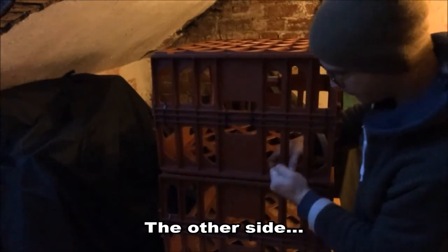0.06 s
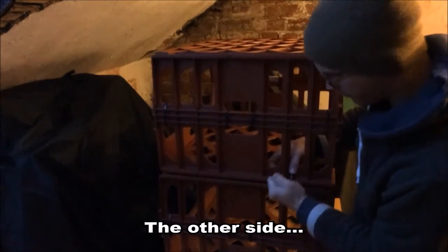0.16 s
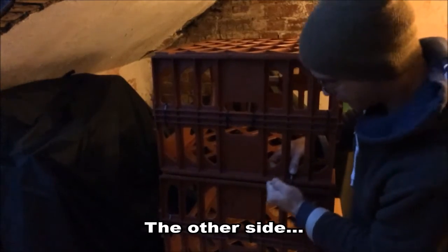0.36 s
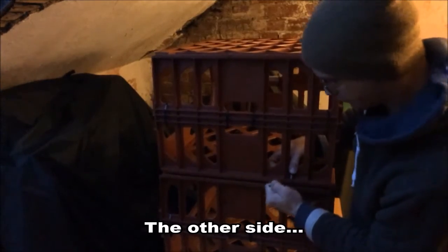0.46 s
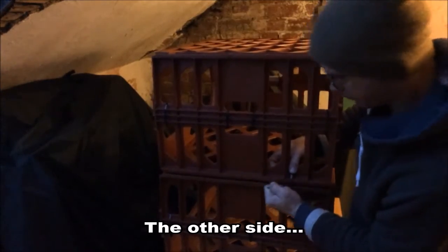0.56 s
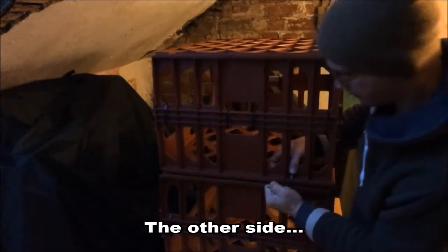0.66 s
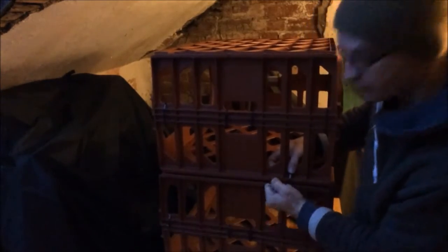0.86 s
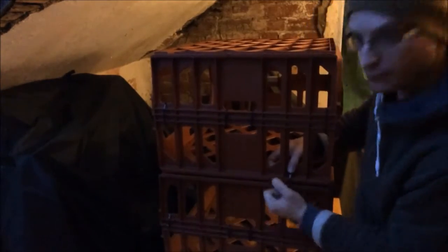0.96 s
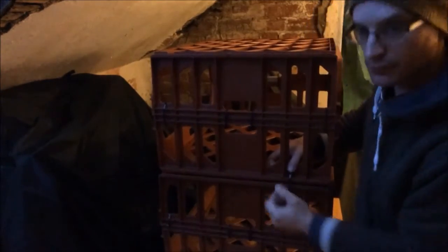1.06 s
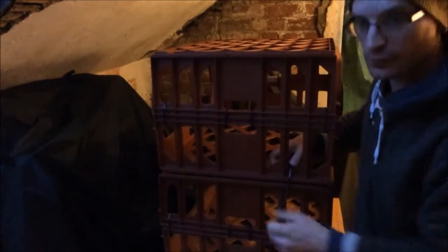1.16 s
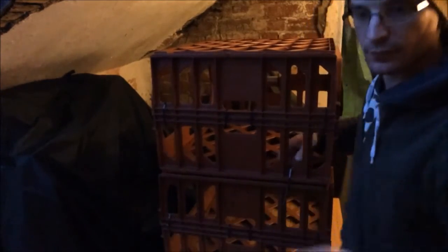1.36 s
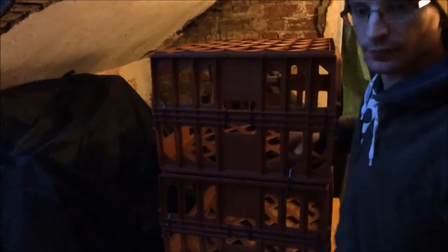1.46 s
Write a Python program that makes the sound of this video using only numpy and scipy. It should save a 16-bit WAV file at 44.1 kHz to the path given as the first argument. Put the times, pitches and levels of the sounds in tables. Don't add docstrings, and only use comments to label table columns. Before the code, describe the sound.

Cable tie ratchet clicks quickly, then snaps hard against a ringing crate in a small attic

```python
import sys
import numpy as np
from scipy import signal
from scipy.fft import rfft, irfft
from scipy.io import wavfile
from scipy.ndimage import uniform_filter1d

SR = 44100
rng = np.random.default_rng(int(sys.argv[2]) if len(sys.argv) > 2 else 0)


def generate_wav(signal):
    frames = np.transpose(np.atleast_2d(signal))
    scaled = np.clip(frames, -1, 1) * 32767
    pcm = np.round(scaled).astype(np.int16)
    wavfile.write(sys.argv[1], SR, pcm)


def how_loud(loudness_db):
    steps = np.asarray(loudness_db, float) / 20
    return 10 ** steps


N = 66150
T = np.arange(N) / SR


def unit(x):
    return x / np.sqrt(np.mean(x ** 2))


def band(x, hz, q):
    return signal.lfilter(*signal.iirpeak(hz, max(q, hz / SR * 3), fs=SR), x)


def high(x, hz):
    return signal.sosfiltfilt(signal.butter(8, hz, "high", fs=SR, output="sos"), x)


def walk(rate):
    hold = int(SR / rate)
    levels = np.repeat(rng.standard_normal(N // hold + 1), hold)
    return uniform_filter1d(uniform_filter1d(levels, hold), hold)[:N]


def air():
    # frequency in Hz, level in dB per Hz.
    air_colour = [(18, -35.5), (30, -11), (137, -2.5), (213, -8), (532, -15.5), (808, -17.5), (1260, -20.5),
                  (2070, -23.5), (15500, -46)]
    air_db, flicker_db, flicker_hz = -63, 2, 9.1
    points = np.array(air_colour)
    f = np.arange(N // 2 + 1) * SR / N + 1
    colour = how_loud(np.interp(np.log(f), np.log(points[:, 0]), points[:, 1]))
    out = 0
    for hz in 30 * 2. ** np.arange(10):
        share = np.cos(np.pi / 2 * np.clip(np.log2(f / hz), -1, 1))
        octave = irfft(rfft(rng.standard_normal(N)) * colour * share, N)
        out = out + how_loud(flicker_db * walk(flicker_hz)) * octave
    return how_loud(air_db) * unit(out)


def brush():
    # time in seconds, level in dB.
    arm_path = [(0, -77.5), (.045, -78.5), (.11, -82.5), (.3, -66), (.53, -82.5), (.6, -75.5), (.91, -75.5),
                (.97, -78), (1.09, -78.5), (1.19, -74), (1.25, -80.5), (1.35, -83), (1.41, -74),
                (1.5, -77.5)]
    grain_db, cloth_hz, trim_db = 1.5, 7820, -2
    points = np.array(arm_path)
    grain = rng.standard_normal(N) * how_loud(grain_db * walk(400))
    loudness = how_loud(trim_db + np.interp(T, points[:, 0], points[:, 1]))
    return loudness * unit(band(grain, cloth_hz, 0.27))


def ratchet(rows, modes, fizz_db):
    tooth_s, tooth_jitter, tooth_db = 0.00045, 0.3, 1.5
    click_q, scrape_db, fizz_hz = 0.866, -12, 5860
    ring_cycles = 1.195
    echo_db, ring_echo_db = 4, -3.5
    out, t = np.zeros((2, N + 8192)), T[:4096]
    for s, db, hz, length, ring_db in rows:
        gap, size, phase = rng.standard_normal((3, 40))
        push = np.zeros((2, len(t)))
        at = np.cumsum(tooth_s * np.exp(tooth_jitter * gap))
        sample = np.minimum((at - at[0]) * SR, len(t) - 1).astype(int)
        np.add.at(push[0], sample, how_loud(tooth_db * size))
        push[0] += how_loud(scrape_db) * rng.standard_normal(len(t))
        push[0] *= np.exp(-(t / length) ** 2)
        push[1, 0] = 1

        ring = np.zeros(len(t))
        for (f, g, t60), p in zip(modes, phase):
            fade = np.exp(-np.log(1000) * t / t60) * (1 - np.exp(-t * f / ring_cycles))
            ring += how_loud(g) * np.sin(2 * np.pi * f * t + p) * fade

        click = band(band(push, hz, click_q), hz, click_q / 2)
        fizz = signal.lfilter(*signal.butter(2, fizz_hz, "high", fs=SR), push)
        click = click - how_loud(fizz_db) * fizz
        click = click / np.linalg.norm(click, axis=1, keepdims=True)
        click = click / abs(click[0]).max() * np.array([[1], [how_loud(echo_db)]])
        ring = ring / abs(ring).max() * how_loud(ring_db) * np.array([[1], [how_loud(ring_echo_db)]])
        i = int(s * SR)
        out[:, i:i + len(t)] += how_loud(db) * (click + ring)
    return out[:, :N]


def skips():
    # start in seconds, level in dB, click colour in Hz, burst length in seconds, crate ring in dB.
    skip_rows = [(.0409, -55.5, 8840, 0.00363, -28), (.1507, -66, 3960, 0.0041, 3.5),
                 (.1872, -32.5, 4710, 0.00395, -10), (.2135, -30.5, 2780, 0.00098, -3.5),
                 (.2245, -53.5, 11000, 0.0017, -26.5), (.235, -56.5, 7500, 0.0027, 3),
                 (.2742, -43, 8400, 0.00083, -35.5), (.713, -63.5, 3930, 0.0036, -13),
                 (.822, -60, 2980, 0.00245, -1), (.9947, -59, 5450, 0.0024, -2.5),
                 (1.0411, -65.5, 4500, 0.0053, -13.5), (1.19, -68, 9000, 0.0023, -23),
                 (1.2816, -64.5, 3300, 0.0031, -16.5)]
    # mode in Hz, level in dB, t60 in seconds.
    wall_modes = [(606.3, -4, 0.0955), (1886.6, 0, 0.0423), (2157, 3.5, .04), (2506, -5.5, 0.1),
                  (3100, 2, .012), (3300, 11.5, 0.0183), (4240, 3.5, 0.022), (7030, -5.5, 0.017)]
    return ratchet(skip_rows, wall_modes, fizz_db=-22)


def attic(x):
    t60_s, build_s, wet_db, tilt = 0.1596, 0.00273, -1.5, 0.0405
    t = T[:SR // 3]
    fade = (1 - np.exp(-t / build_s)) * np.exp(-np.log(1000) * t / t60_s)
    tail = signal.lfilter([1, -tilt], [1], rng.standard_normal(len(t)) * fade)
    return how_loud(wet_db) * signal.fftconvolve(x, tail / np.sqrt(np.sum(tail ** 2)))[:N]


def swells(rows, q, grain_db):
    span = 8192
    out = np.zeros(N + span)
    grain = how_loud(grain_db * walk(600))[:span]
    for s, db, hz, length in rows:
        x = unit(band(band(rng.standard_normal(span) * grain, hz, q), hz, q))
        i = max(int(s * SR) - span // 2, 0)
        t = (i + np.arange(span)) / SR - s
        out[i:i + span] += how_loud(db) * x * np.exp(-(t / (length / 2)) ** 2)
    return out[:N]


def shuffle():
    # centre in seconds, level in dB, pitch in Hz, length in seconds.
    shuffle_rows = [(.06, -66, 392, 0.022), (.298, -45.5, 4140, 0.0091), (.315, -59.5, 98, 0.048),
                    (.345, -62.5, 313.2, 0.0657), (0.568, -75.5, 2130, 0.049), (0.637, -74.5, 2160, 0.029),
                    (.715, -73.5, 2143, 0.083), (0.833, -75, 1990, 0.044), (0.738, -60, 116.5, 0.0144),
                    (0.926, -62.5, 125.8, 0.0184), (.948, -59.5, 348, 0.0318), (0.98, -58, 119.3, 0.087),
                    (.97, -65, 218, 0.0317), (0.999, -57, 244, .02), (1.007, -50.5, 108.8, 0.0144),
                    (1.037, -63.5, 150, 0.06), (1.104, -62, 265, 0.0256), (1.17, -68.5, 457.5, 0.052),
                    (1.185, -78.5, 4190, 0.048), (.996, -70.5, 5640, 0.005), (.942, -66.5, 815, 0.0089)]
    return swells(shuffle_rows, q=2.945, grain_db=2)


def rubs():
    # centre in seconds, level in dB, colour in Hz, length in seconds.
    rub_rows = [
        (.06, -66.5, 1480, 0.0194),
        (.18, -60.5, 1470, 0.0108),
        (.941, -61, 700, 0.0134),
        (.998, -63, 692, 0.023),
        (1.045, -64.5, 1816, 0.0154),
        (1.1, -70, 688, 0.0194),
        (1.163, -64, 1105, 0.0197),
        (1.19, -70.5, 2190, 0.023),
        (1.29, -70, 1376, 0.0212),
        (1.39, -72.5, 1486, 0.0323),
    ]
    return swells(rub_rows, q=0.76, grain_db=3.5)


def snap():
    # start in seconds, level in dB, click colour in Hz, burst length in seconds, crate ring in dB.
    snap_rows = [
        (.3008, -19.5, 2767, 0.0049, 1),
    ]
    # mode in Hz, level in dB, t60 in seconds.
    bar_modes = [(623.5, -16, 0.0432), (784.6, -7.5, 0.0443), (952.7, -6.5, 0.0786), (1442, -24.5, 0.047),
                 (1950, -3, 0.0575), (2349.5, 11, 0.0125), (2810, -11, 0.04), (3165, -7, 0.047),
                 (4122, 2.5, 0.0332), (4409, -1.5, 0.031), (4970, -11, .02), (6074, -13.5, 0.014),
                 (6614, -5.5, .015)]
    return ratchet(snap_rows, bar_modes, fizz_db=-14)


def scene():
    no_bass = signal.butter(5, 362, "high", fs=SR, output="sos")
    direct, echo = signal.sosfilt(no_bass, skips() + snap())
    return (direct + attic(echo) + air() + brush() + shuffle() + rubs())[None]


def top_cut(x):
    return signal.sosfilt(signal.butter(12, 15810, fs=SR, output="sos"), x)


def record(dry):
    # centre in seconds, lost above in Hz, depth in dB.
    dropouts = [
        (.671, 1500, -9),
        (0.947, 2540, -19.5),
        (1.226, 2065, -25.5),
        (1.376, 4060, -18.5),
        (1.503, 3000, -9),
    ]
    top_hz, dropout_s = 15350, 0.027
    x = signal.sosfilt(signal.ellip(8, .5, 50, top_hz, fs=SR, output="sos"), dry)
    for s, hz, db in dropouts:
        dip = np.cos(np.pi * np.clip((T - s) / dropout_s, -.5, .5)) ** 2
        x = x - (1 - how_loud(db)) * dip * high(x, hz)
    return top_cut(x)


dry = scene()
out = record(dry)
generate_wav(out)
```